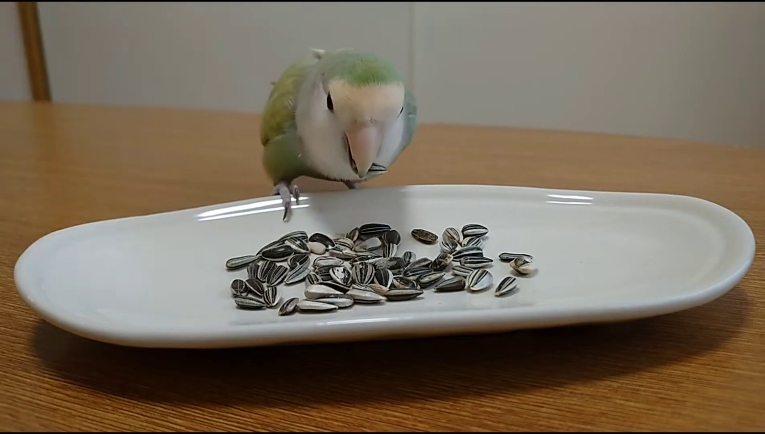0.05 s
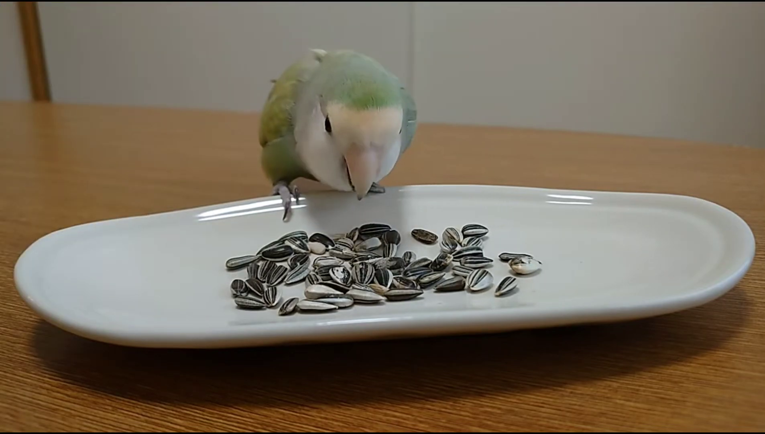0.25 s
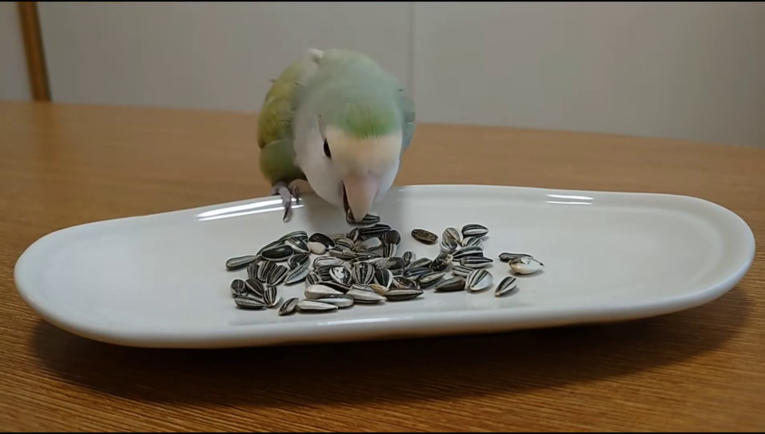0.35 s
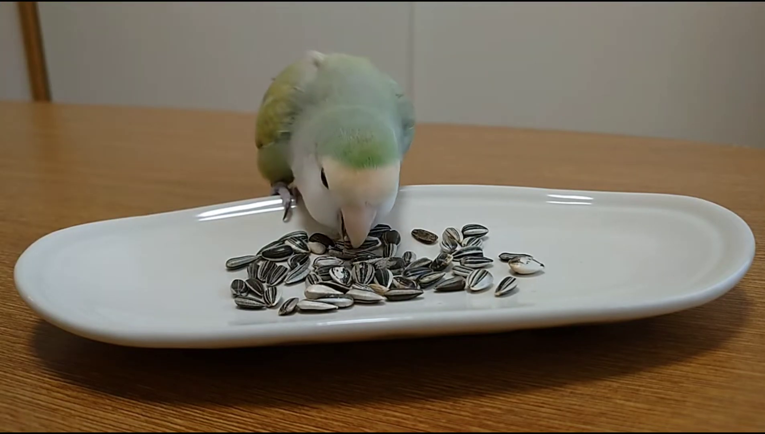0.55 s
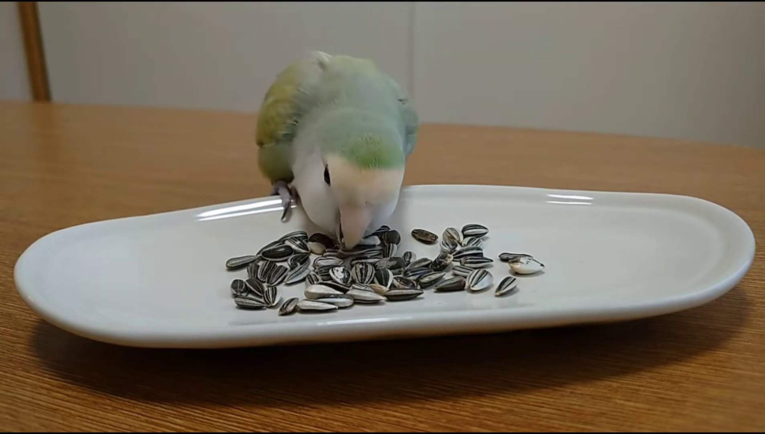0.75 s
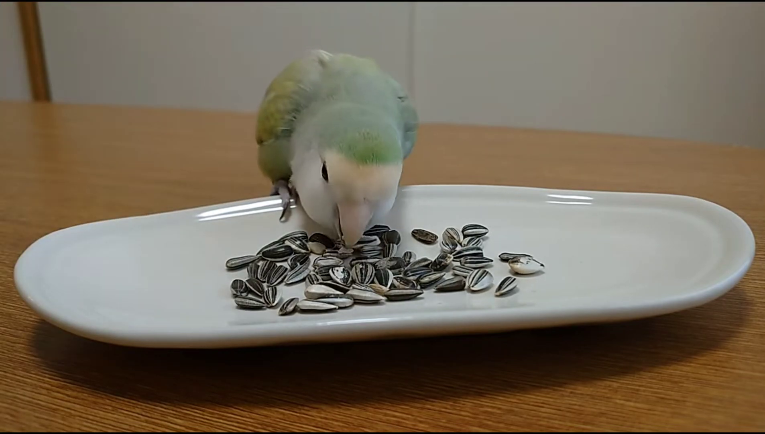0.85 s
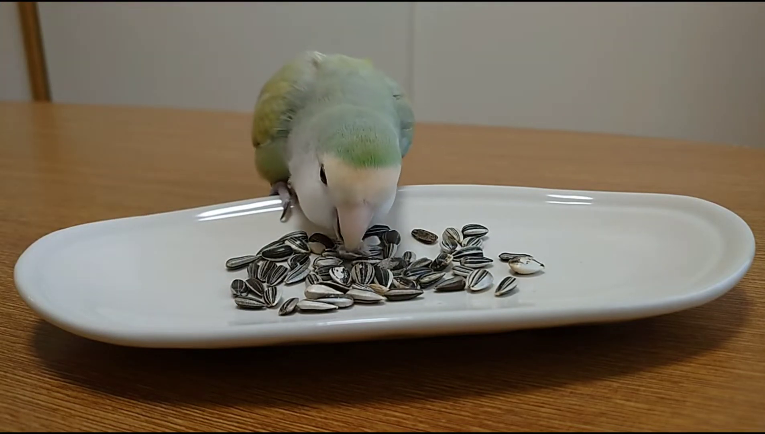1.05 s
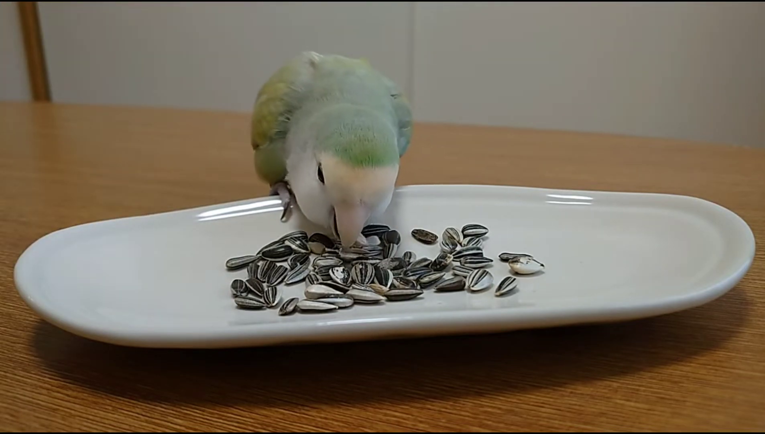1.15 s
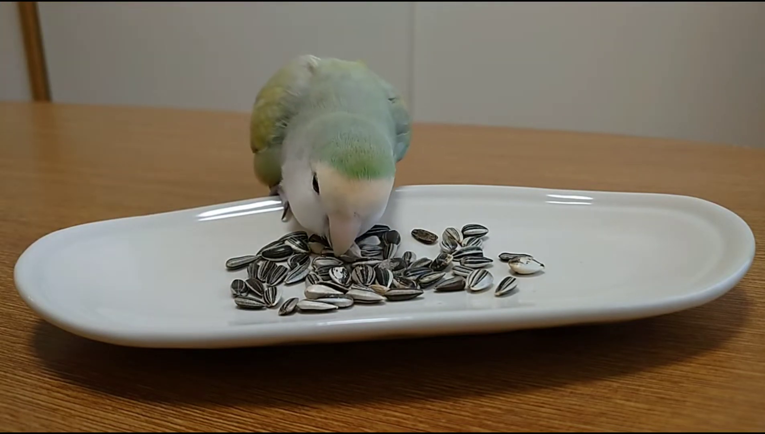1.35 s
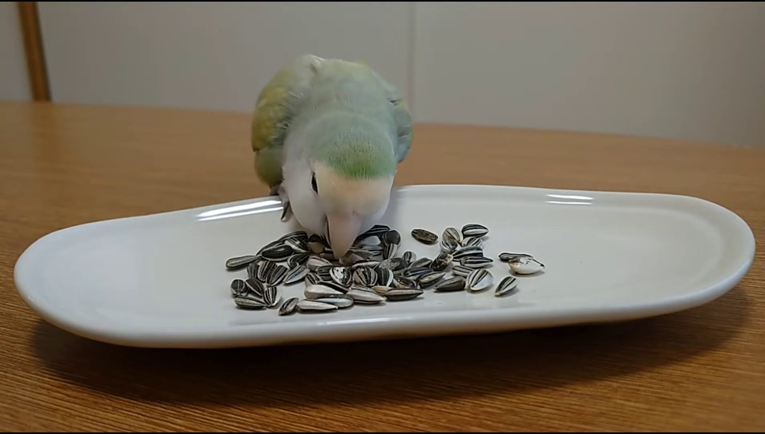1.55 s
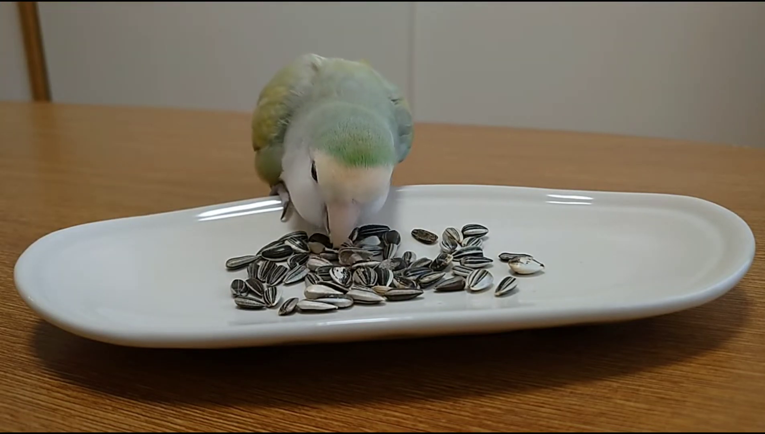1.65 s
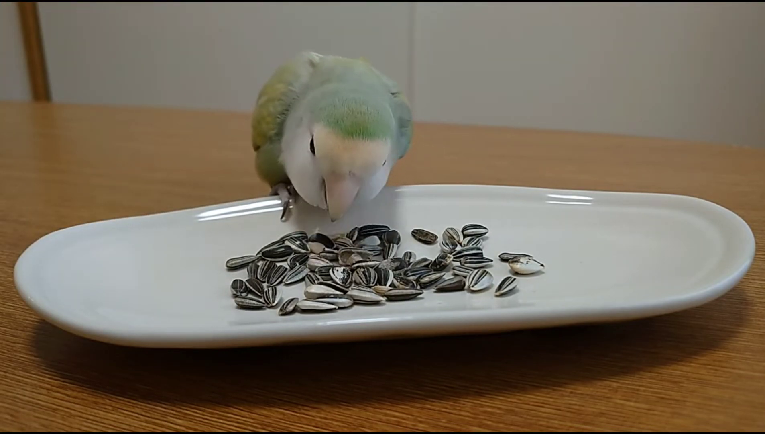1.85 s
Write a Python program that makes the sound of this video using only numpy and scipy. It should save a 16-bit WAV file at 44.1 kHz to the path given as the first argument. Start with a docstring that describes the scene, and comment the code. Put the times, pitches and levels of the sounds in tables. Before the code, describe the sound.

A small bird chirps and squawks, then picks at seeds with tiny clicks.

```python
"""A lovebird on a china dish in a small room gives a clear chirp and a rough squawk as the echo of an
earlier call dies away. The chirp is one trembling syrinx tone; the squawk is both sides of the syrinx
at once, with sum tones and throat rasp. The bird picks at sunflower seeds: husks ring in tiny clicks,
among faint peeps. Under it lie room air, an appliance hum and a low rumble that settles."""
import sys
import numpy as np
from scipy import signal
from scipy.fft import rfft, irfft
from scipy.io import wavfile
from scipy.ndimage import uniform_filter1d

SR = 44100
rng = np.random.default_rng(int(sys.argv[2]) if len(sys.argv) > 2 else 0)


def pcm_store(signal):
    """Save signal as 16-bit PCM."""
    levels = np.round(np.clip(np.atleast_2d(signal), -1, 1) * 32767)
    wavfile.write(sys.argv[1], SR, levels.astype(np.int16).T)


N = 83790
LEAD_S = .1
TIME_S = np.arange(-int(LEAD_S * SR), N) / SR
N_FULL = len(TIME_S)
FREQS_HZ = np.fft.rfftfreq(N_FULL, 1 / SR)

# Room air and rumble spectra. Each row: frequency in Hz, relative density in dB.
AIR_SPECTRUM = [(10, 1.5), (25, 7), (40, -16.5), (65, -13.5), (105, -5), (170, -5.5), (280, -10.5),
                (380, -21), (650, -18), (1100, -28.5), (3300, -39.5), (5600, -49.5), (8000, -54),
                (16000, -47)]
RUMBLE_SPECTRUM = [(20, 1.5), (80, 1.5), (160, -9), (400, -20.5), (1500, -41), (5000, -72)]
# Rumble envelope. Each row: time in seconds, level in dB.
RUMBLE_ENVELOPE = [(0, -46.5), (.08, -54.5), (.18, -70.5), (.25, -58.5), (.32, -70), (.39, -60), (.47, -76),
                   (.555, -64.5), (.65, -75), (1.9, -94.5)]
# Hum and thin whine. Each row: frequency in Hz, level in dB.
HUM_TONES = [(97, -69.5), (131, -74), (6620, -102), (7040, -99)]

# Earlier call. Each row: time in seconds, pitch in Hz, tone in dB, rasp in dB.
EARLIER_CONTOUR = [(-.07, 3600, -34, -58.5), (-.05, 4327, -30.5, -35.5), (-.025, 3934, -26.5, -28),
                   (.002, 3517, -36.5, -49)]
# Its throat rasp. Each row: frequency in Hz, relative density in dB.
EARLIER_RASP = [(400, -3), (1400, -15), (2200, -1.5), (2800, 7.5), (3250, -9.5), (3900, 3), (5000, 3),
                (6800, -14.5), (9000, -12), (11500, -7), (16000, -13.5)]

# Husk snaps, before SNAP_PATH. Each row: start in seconds, body in dB, crack in dB, tick in dB.
SNAPS = [(.067, -50.5, -80, -58), (0.102, -59, -64.5, -60.5), (0.1179, -49.5, -57, -55.5),
         (.129, -59.5, -65.5, -57), (.567, -67.5, -62, -47.5), (.636, -66, -66, -57),
         (.650, -68, -54.5, -45.5), (.9035, -63, -84, -74), (.956, -69.5, -90, -77),
         (1.060, -51, -72, -53.5), (1.0626, -63, -63, -59), (1.180, -68.5, -65.5, -79),
         (1.284, -69, -71, -86), (1.627, -72.5, -73.5, -77), (1.719, -73.5, -80, -86),
         (1.804, -75, -77, -91), (1.862, -58, -57.5, -103)]
# Husk resonances. Each row: frequency in Hz, T60 in seconds, relative level in dB.
BODY_MODES = [(1180, 0.018, 0.5), (1598, .02, 8.5), (1950, .012, -6.5)]
CRACK_MODES = [(2230, .004, -5), (3000, 0.0088, 0.61), (3600, 0.0019, -5.5)]
# Bright tick of a snap. Each row: frequency in Hz, relative density in dB.
TICK_SPECTRUM = [(500, -24.5), (1000, -8.5), (3600, 0), (5200, -14.5), (8500, -8.5), (11000, 1.5),
                 (13500, -6.5), (16000, -1)]
# Path from husk to listener. Each row: frequency in Hz, gain in dB.
SNAP_PATH = [(500, 1.5), (1500, -4.5), (3600, -2), (5000, 2.5), (6000, -10.5), (8500, -5.5), (11000, 0)]

# Chirp melody. Each row: time in seconds, pitch in Hz.
CHIRP_CONTOUR = [(.2015, 4400), (.205, 3300), (.208, 3330), (.2115, 3150), (.2142, 4720), (.2205, 4850),
                 (.2235, 4940), (.227, 5200), (.231, 4960), (.236, 5120), (.243, 4900)]
# Chirp fundamental. Each row: time in seconds, level in dB.
CHIRP_ENVELOPE = [(.2012, -37), (.2025, -27.5), (.208, -20.5), (.2115, -36.5), (.2142, -17.5),
                  (.222, -13.5), (.227, -19.5), (.232, -15), (.236, -14.5), (.242, -31), (.246, -49)]
# Chirp harmonics 2 to 4, before the beak. Each entry: level in dB for a 0 dB fundamental.
CHIRP_OVERTONES_DB = [-29, -36.5, -27.5]
# Beak filter on the chirp's overtones and air. Each row: frequency in Hz, gain in dB.
BEAK_RESPONSE = [(150, -10), (700, -16), (1150, -8), (1800, -14.5), (3100, 8.5), (4000, -3), (6500, -0.5),
                 (8800, -13), (9800, -8), (10500, 7), (11400, -8), (13000, -4), (16000, -7.5)]

# Both sides of the syrinx. Each row: time in seconds, low voice in Hz, its level in dB,
# high voice in Hz, its level in dB, its octave in dB, rasp in dB.
SQUAWK_CONTOUR = [(.342, 2864, -49, 4582, -59, -83, -63.5), (.3495, 2640, -32.5, 3985, -23, -59.5, -46.5),
                  (.3525, 2501, -38.5, 4590, -41, -63.5, -44.5),
                  (0.356, 2402, -41.5, 4125, -24.5, -49.5, -33),
                  (0.359, 2597, -27.5, 4947, -27.5, -50.5, -29.5), (0.3613, 2156, -33, 4310, -20, -45, -40),
                  (.367, 3264, -23, 4700, -27.5, -55, -35), (.374, 3058, -35.5, 4990, -27.5, -43.5, -40),
                  (.377, 2825, -20, 5033, -29, -46, -34.5), (.381, 2627, -35.5, 4637, -32, -57.5, -38.5),
                  (.384, 3098, -53.5, 5106, -30, -32.5, -43.5),
                  (0.3882, 2720, -39.5, 5206, -20.5, -34, -31), (.392, 3200, -43, 5494, -35, -25.5, -39),
                  (0.399, 3000, -48, 5227, -25, -43.5, -39.5)]
# Air in throat and beak. Each row: frequency in Hz, relative density in dB.
SQUAWK_RASP = [(150, -29), (600, -28.5), (1150, -19.5), (1600, -23), (2100, 1), (2700, 5.5), (3400, 1),
               (5000, -2.5), (6200, 2), (8800, -10), (12000, 1.5), (14000, -6), (16000, -6.5)]

# Faint peeps. Each row: centre in seconds, level in dB.
PEEP_EVENTS = [(.695, -70), (.765, -77.5), (.812, -73), (.826, -72), (.855, -71), (1.194, -71.5),
               (1.552, -75.5), (1.580, -82.5)]

# Table and dish reflections. Each row: delay in seconds, left gain, right gain.
REFLECTIONS = [(.0016, .16, 0.16), (.0053, -.15, 0.24)]
# Room decay. Each row: frequency in Hz, T60 in seconds.
ROOM_DECAY = [(300, 0.13), (1500, 0.35), (3000, 0.26), (5000, 0.293), (8000, 0.089), (11000, 0.19),
              (16000, 0.11)]
# Room tail colour. Each row: frequency in Hz, gain in dB.
ROOM_RESPONSE = [(300, 3.5), (2500, -3.5), (5000, -5), (7000, 2), (9000, 5), (11000, -4.5), (13000, -2.5),
                 (16000, 0.5)]
# Balance of the calls. Each row: frequency in Hz, left over right in dB.
CALL_PAN = [(1000, 2.5), (4500, 2.5), (8000, -0.5), (11000, 13.5), (16000, 3)]


def undb(db):
    """Decibels to gain."""
    return 10 ** (np.asarray(db) / 20)


def curves(table):
    """Each value column, interpolated over time."""
    times_s, *columns = np.array(table).T
    return [np.interp(TIME_S, np.sort(times_s), column) for column in columns]


def gate(table):
    """One over the table's time span, zero outside; soft edges."""
    return uniform_filter1d(1. * ((TIME_S > table[0][0]) & (TIME_S < table[-1][0])), size=32)


def over_frequency(table):
    """A (Hz, value) table, interpolated over log frequency."""
    hz, value = np.array(table).T
    return np.interp(np.log(FREQS_HZ + 1), np.log(hz), value)


def filtered(x, response):
    """Zero-phase filter with a (Hz, dB) response."""
    return irfft(rfft(x) * undb(over_frequency(response)), N_FULL)


def noise(spectrum):
    """Coloured noise, unit rms."""
    x = filtered(rng.standard_normal(N_FULL), spectrum)
    return x / x.std()


def wobble(samples):
    """Smooth random drift, unit spread."""
    x = uniform_filter1d(uniform_filter1d(rng.standard_normal(N_FULL), samples), samples)
    return x / x.std()


def membrane_phase(hz, jitter):
    """Phase of a membrane whose pitch trembles by the fraction jitter."""
    return 2 * np.pi * np.cumsum(hz * (1 + jitter * wobble(samples=24))) / SR


def tone(phase, rms_db):
    """Sine at an rms level."""
    return np.sqrt(2) * undb(rms_db) * np.sin(phase)


def decay(age_s, t60_s):
    """Exponential fall, 60 dB in t60_s."""
    return np.exp(-np.log(1000) * age_s / t60_s)


def pan(left_db):
    """Stereo gains; positive leans left."""
    return undb(np.vstack([left_db, -left_db]) / 2)


def background():
    """Room air, an appliance hum and a low rumble that settles."""
    def wide(spectrum):
        return noise(spectrum) + noise(spectrum) * np.array([[.5], [-.5]])

    hum = sum(tone(2 * np.pi * hz * TIME_S + .13 * wobble(samples=5000), db) for hz, db in HUM_TONES)
    air = undb(-66) * wide(AIR_SPECTRUM)
    rumble = undb(curves(RUMBLE_ENVELOPE)[0]) * wide(RUMBLE_SPECTRUM)
    return pan(left_db=4.5) * (air + hum) + pan(left_db=10) * rumble


def earlier_call():
    """Hoarse note with a half-pitch undertone, in the lead-in; mostly its echo is heard."""
    hz, db, rasp_db = curves(EARLIER_CONTOUR)
    phase = membrane_phase(hz, jitter=.021)
    voice = tone(phase, db) + tone(phase / 2, db - 13.5)
    rasp = undb(rasp_db) * noise(EARLIER_RASP)
    return (voice + rasp) * gate(EARLIER_CONTOUR)


def husk_snaps(rms_span_s=.0031):
    """The beak snaps husks: each rings a hollow body and a crack, with a bright tick."""
    length = SR // 20
    age_s = np.arange(length) / SR

    def unit(x):
        return x / np.sqrt((x ** 2).sum() / (SR * rms_span_s))

    def ring(modes):
        return sum(undb(db) * np.sin(2 * np.pi * hz * age_s) * decay(age_s, t60_s)
                   for hz, t60_s, db in modes)

    body, crack = unit(ring(BODY_MODES)), unit(ring(CRACK_MODES))
    grit = noise(TICK_SPECTRUM)
    out = np.zeros(N_FULL + length)
    for k, (start_s, body_db, crack_db, tick_db) in enumerate(SNAPS):
        tick = unit(grit[k * length:(k + 1) * length] * decay(age_s, t60_s=.005))
        i = np.searchsorted(TIME_S, start_s)
        out[i:i + length] += undb(body_db) * body - undb(crack_db) * crack + undb(tick_db) * tick
    return filtered(out[:N_FULL], SNAP_PATH)


def chirp(overtone_db_per_db=.55):
    """A low grace note leaps to a loud whistle; weak overtones and air pass through the beak."""
    (hz,), (db,) = curves(CHIRP_CONTOUR), curves(CHIRP_ENVELOPE)
    phase = membrane_phase(hz, jitter=.013)
    overtones = sum(tone(k * phase, base_db + overtone_db_per_db * db) * (k * hz < SR / 2)
                    for k, base_db in enumerate(CHIRP_OVERTONES_DB, 2))
    air = undb(db - 17.5) * noise(BEAK_RESPONSE)
    return (tone(phase, db) + filtered(overtones, BEAK_RESPONSE) + air) * gate(CHIRP_ENVELOPE)


def squawk(flutter_db=2):
    """Two unsteady syrinx voices with sum tones and pulsed rasp, ending in a squeal an octave up."""
    low_hz, low_db, high_hz, high_db, octave_db, rasp_db = curves(SQUAWK_CONTOUR)
    unsteadiness = 1 / (1 + undb(octave_db - rasp_db))  # the high voice steadies as it squeals
    low_phase = membrane_phase(low_hz, jitter=.082)
    high_phase = membrane_phase(high_hz, jitter=.028 * unsteadiness)
    low_db += flutter_db * wobble(samples=40)
    high_db += flutter_db * wobble(samples=40)
    voices = tone(low_phase, low_db) + tone(high_phase, high_db) + tone(2 * high_phase, octave_db)
    sum_db = (low_db + high_db) / 2 - 15
    sum_tones = (tone(low_phase + high_phase, sum_db)
                 + tone(low_phase + 2 * high_phase, sum_db - 4.5)
                 + tone(2 * low_phase + high_phase, sum_db - 4.5))
    pulsed_air = rng.standard_normal(N_FULL) * (1 + .22 * np.sin(low_phase))
    rasp = filtered(pulsed_air, SQUAWK_RASP)
    return (voices + sum_tones + undb(rasp_db) * rasp / rasp.std()) * gate(SQUAWK_CONTOUR)


def peeps(half_width_s=.0041):
    """Soft, short peeps on one trembling pitch."""
    envelope = sum(undb(db) * np.exp(-((TIME_S - centre_s) / half_width_s) ** 2)
                   for centre_s, db in PEEP_EVENTS)
    return envelope * tone(membrane_phase(hz=3200, jitter=.05), rms_db=0)


def in_room(x, left_db, room_db, right_lag_s=.00014, build_s=.0019):
    """Stereo direct sound, reflections off table and dish, and the room's tail."""
    def delay(seconds):
        return np.exp(-2j * np.pi * FREQS_HZ * seconds)

    lag = delay(np.array([[0], [right_lag_s]]))
    echoes = sum(np.array([[left], [right]]) * delay(delay_s) for delay_s, left, right in REFLECTIONS)
    early = irfft(rfft(x) * (1 + echoes) * lag * pan(left_db), N_FULL)
    age_s = TIME_S - TIME_S[0]
    white = rfft(rng.standard_normal((2, N_FULL)))
    tail = np.zeros((2, N_FULL))
    for band_hz, t60_s in ROOM_DECAY:
        band = over_frequency([(hz, float(hz == band_hz)) for hz, _ in ROOM_DECAY])
        tail += irfft(white * band, N_FULL) * decay(age_s, t60_s)
    tail *= 1 - np.exp(-(age_s / build_s) ** 2)
    tail /= np.sqrt((tail ** 2).sum(axis=1, keepdims=True))
    wet = signal.fftconvolve(x[None], tail, axes=1)[:, :N_FULL]
    return early + undb(room_db) * filtered(wet, ROOM_RESPONSE)


def scene():
    """Calls, snaps and peeps in the room, over the background; lead-in dropped."""
    calls = earlier_call() + chirp() + squawk()
    mix = in_room(calls, left_db=over_frequency(CALL_PAN), room_db=-4)
    mix += in_room(husk_snaps(), left_db=9.5, room_db=-5)
    mix += in_room(peeps(), left_db=9.5, room_db=-.5)
    return (mix + background())[:, -N:]


def record(dry):
    """Steep low-pass at 16 kHz."""
    return signal.sosfilt(signal.ellip(10, .2, 70, 16000, fs=SR, output="sos"), dry)


dry = scene()
out = record(dry)
pcm_store(out)
```